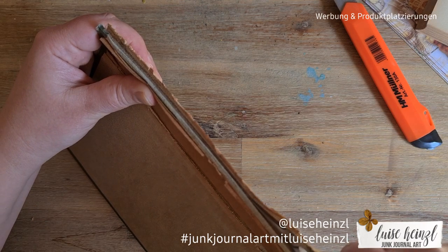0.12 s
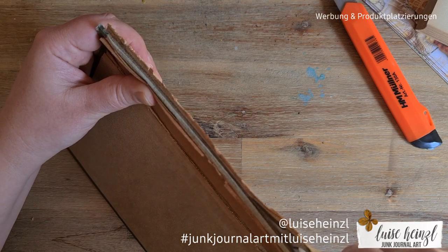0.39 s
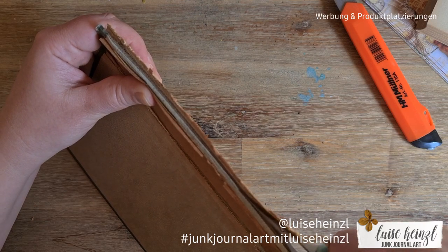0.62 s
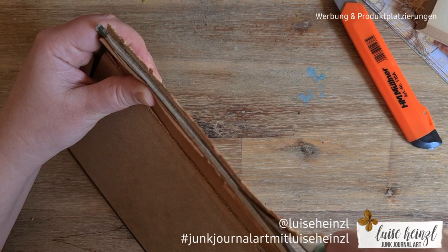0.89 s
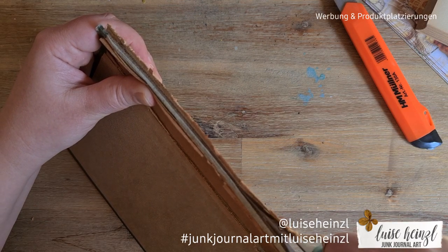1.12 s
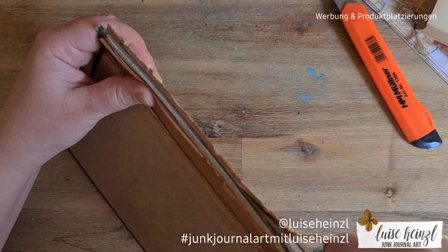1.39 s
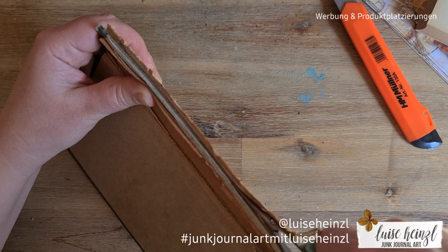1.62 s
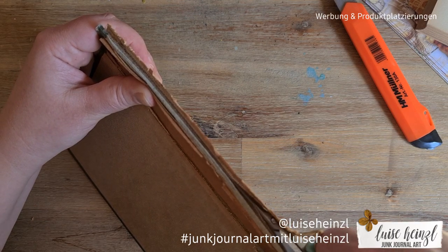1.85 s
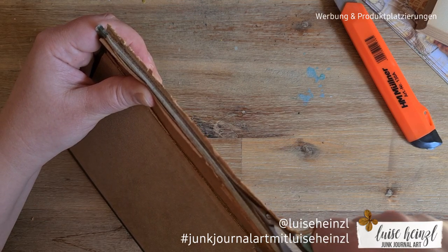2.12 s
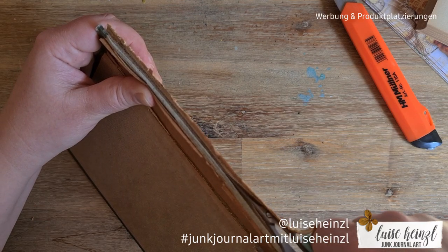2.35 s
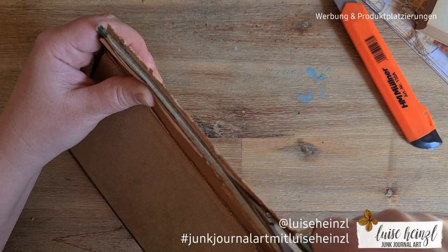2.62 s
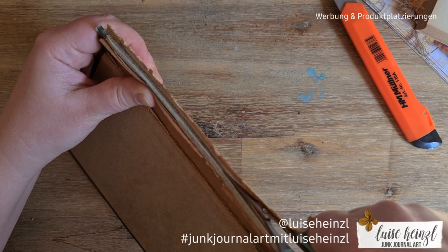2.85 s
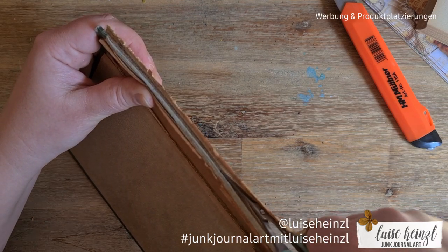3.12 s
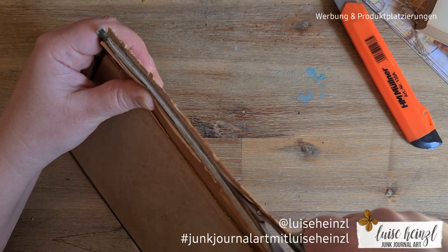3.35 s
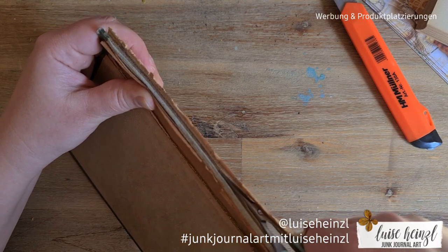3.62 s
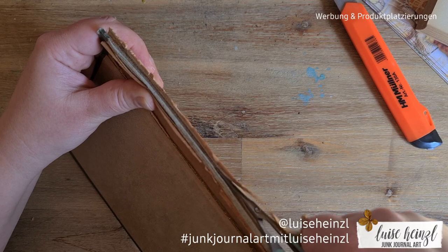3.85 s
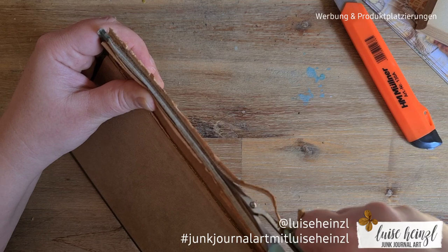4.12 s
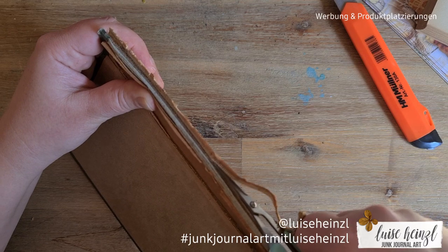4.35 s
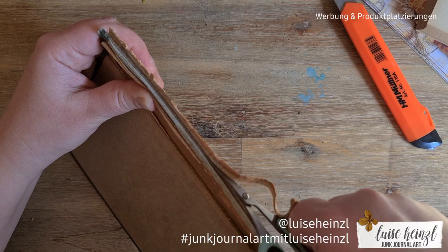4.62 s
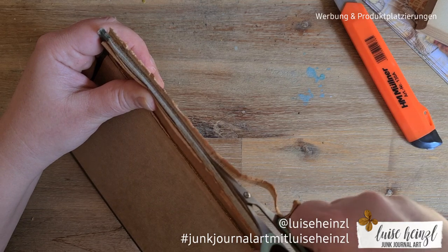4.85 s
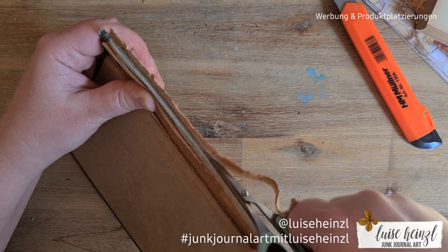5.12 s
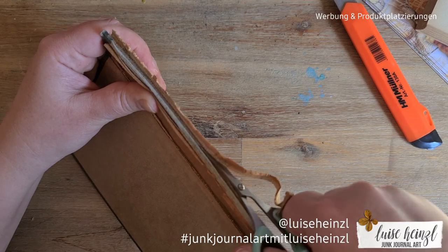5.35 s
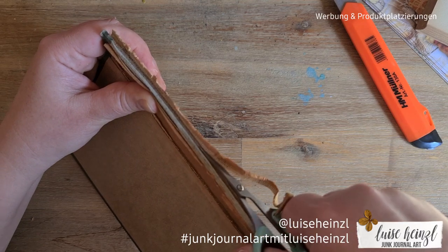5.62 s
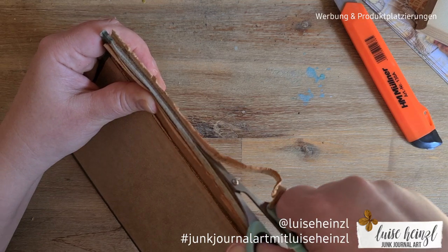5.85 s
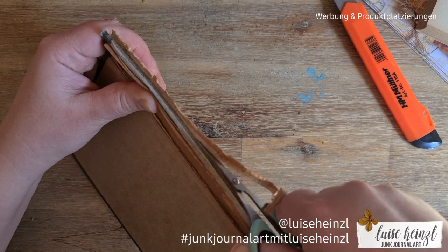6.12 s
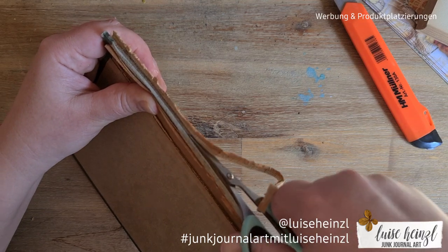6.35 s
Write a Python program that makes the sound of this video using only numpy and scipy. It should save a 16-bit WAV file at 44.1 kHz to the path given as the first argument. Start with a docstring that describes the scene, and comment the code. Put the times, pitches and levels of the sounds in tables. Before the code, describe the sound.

Close stereo pickup of scissors cutting stiff cardboard over a wooden table in a small, quiet room. From 0 to 0.4 s light snaps crackle in quick succession, then a rasp of opening blades at 0.5-0.85 s. After a short lull, a small cluster of snips comes at 1.2-1.4 s, with a scrape and slight high whistle near 1.6 s. Another crackling bite at 1.9 s and a firmer one at 2.5 s are each followed by rubbing. A single thudding snip lands at 3.25 s, then dense crunchy bursts at 3.65-3.8 and 4.2-4.4 s. Stronger, woody snaps follow at 4.95-5.1, 5.55-5.65 and 6.1-6.25 s, with low table knocks. The most prominent scrape is at 5.3 s; a final rub ends near 6.45 s. Short diffuse reflections and faint patchy hiss and low rumble continue throughout.

```python
"""Scissors work along the edge of a thick cardboard cover on a wooden table, close to a two-port microphone.
The blades stick, then break through in bursts: each snap is a noisy force that excites board and table modes.
Opening blades rub on the cut edge: unevenly slipping noise through the same modes, with hiss and a whistle.
The room answers with a diffuse decay, and its own patchy noise hisses and rumbles behind."""
import sys
import numpy as np
from scipy import signal
from scipy.fft import rfft, irfft, next_fast_len
from scipy.io import wavfile
from scipy.ndimage import uniform_filter1d, map_coordinates

SR = 44100
rng = np.random.default_rng(int(sys.argv[2]) if len(sys.argv) > 2 else 0)


def rack_gain(trim_db):
    """Turn a fader trim in dB into the linear factor to multiply a signal by."""
    fader = np.asarray(trim_db, float)
    return 10 ** (fader / 20)


def to_wav(s):
    """Save 16-bit WAV."""
    ch = np.atleast_2d(s).T  # columns
    pcm = np.round(np.clip(ch, -1, 1) * 32767)  # PCM
    wavfile.write(sys.argv[1], SR, pcm.astype(np.int16))


N = 285768

# breaks of the cardboard, levels relative: start_s, strength_db, brightness_db_per_octave,
# spot_hz (where the board rings most), thump_db (push on the table)
SNAPS = [(0.0101, -46, -4.5, 700, -72), (0.0188, -43, -7, 700, -48), (0.1437, -39, -4.5, 507, -48.5),
         (0.2581, -46, -3.5, 503, -52), (0.2852, -40, -2.5, 700, -74), (0.379, -38, -1.9, 700, -51),
         (0.405, -36, -0.85, 700, -52), (1.1617, -72, -14, 494, -73), (1.2188, -50.5, -3.2, 700, -49),
         (1.23, -54.5, -0.5, 2900, -55), (1.2425, -40, -5.5, 1400, -52), (1.253, -66, -16, 3000, -44),
         (1.2858, -42.5, -3.5, 1300, -48), (1.3728, -42.5, -7.5, 510, -53), (1.401, -39, -1.5, 490, -46),
         (1.8853, -39.5, -1.5, 463, -45), (1.8954, -55, -2.0, 1850, -56), (1.9095, -38, -3, 700, -41.5),
         (1.9255, -54, -12, 1920, -60), (1.9426, -45.5, -0.1, 516, -48), (1.9521, -45, -7, 1900, -55),
         (1.9685, -47, -2.5, 1780, -45), (2.013, -80, 2.7, 700, -48), (2.4659, -37.5, -4, 1920, -45),
         (2.4902, -31, -3.6, 1290, -42), (2.7467, -62.5, -17, 1390, -55.5), (2.9594, -71, -2.5, 700, -53),
         (3.252, -34, -4.5, 1780, -34), (3.2634, -57.5, -19.5, 1920, -33.5),
         (3.6351, -38.5, -2.2, 1470, -38.5), (3.6611, -43, -5.5, 2740, -35),
         (3.7238, -32.5, -4.5, 1050, -38), (3.7403, -59, -4.7, 980, -47), (3.7556, -43, -2.2, 1010, -32),
         (3.7801, -39, -1.5, 700, -33), (3.7975, -38.5, -5, 5260, -41.5), (4.106, -44, -0.9, 536, -49),
         (4.1964, -53, -3, 1410, -62), (4.2561, -58, -1.5, 480, -56), (4.2733, -51.5, -3.5, 1890, -46),
         (4.305, -36.5, -3, 494, -37), (4.3236, -39, -2, 1370, -32.5), (4.3318, -38, -7, 3040, -41),
         (4.3664, -40, -0.45, 980, -35.5), (4.4016, -40, -2.5, 1320, -33),
         (4.4123, -34.5, -1.95, 960, -34.5), (4.9379, -37, -5, 3200, -42), (4.9477, -44, -6.5, 2930, -51),
         (4.9755, -47, -2, 2900, -45), (5.015, -62, 0.6, 500, -61), (5.0664, -32.5, -5.5, 3200, -31),
         (5.0869, -30, -2, 940, -33), (5.0976, -58.5, -19, 700, -40), (5.5527, -51.5, -4, 500, -51),
         (5.5724, -61.5, -20, 700, -48), (5.585, -32, -4, 1030, -50), (5.6289, -30, -3.2, 2770, -38.5),
         (6.0547, -72.5, 2, 1380, -49.5), (6.109, -43, -3.5, 490, -37), (6.131, -40, -4, 1010, -39),
         (6.1768, -29.5, -2.37, 1020, -30.5), (6.2272, -33.5, -0.75, 465, -34),
         (6.233, -35.5, -3, 700, -33.5), (6.2467, -40, -0.1, 990, -30), (6.3895, -64.5, -0.5, 990, -49),
         (6.448, -70, 1, 700, -43)]
# modes of the table top, levels relative: centre_hz, width_hz, level_db
TABLE_MODES = [(57.2, 4.3, 7.5), (131.6, 13.8, 0.5)]
# modes of the cardboard cover, levels relative: centre_hz, width_hz, level_db
BOARD_MODES = [(218.2, 10.3, -5.5), (366.2, 57, 2), (511.6, 64, 12), (612.6, 42, 17), (696, 53, 20),
               (842, 53, 11.5), (942.3, 26.4, 16), (1055, 90, 11), (1424, 112, 16), (1694, 135, 12),
               (1848, 27, 20), (2073, 50, 21), (2270, 273, 7), (2720, 350, 14.5), (3240, 254, 18.5),
               (4040, 630, 14), (5990, 1630, 7), (7190, 1260, -5), (9040, 1870, 15.5), (11530, 6900, 5),
               (13600, 1000, -3.5)]
# left-right likeness of the forces on the board: frequency_hz, likeness (-1 to 1)
BOARD_LIKENESS = [(700, 1), (1200, 0.16), (1800, 1), (4000, 0.16), (10000, 0.057)]


def unit(x):
    """Normalization: the signal scaled to rms 1."""
    return x / np.sqrt(np.mean(x ** 2) + 1e-20)


def along(points, hz):
    """Logarithmic frequency scale: values interpolated between (Hz, value) points."""
    f, v = np.transpose(points)
    return np.interp(np.log(hz + 1), np.log(f + 1), v)


def wobble(rate):
    """Slow random modulation: a smooth curve through `rate` random knots a second."""
    knots = rng.standard_normal(int(N * rate / SR) + 4)
    return map_coordinates(knots, [np.arange(N) * rate / SR])


def filtered(x, response):
    """Linear filtering: the spectrum times a complex response of frequency."""
    n = x.shape[-1]
    m = next_fast_len(n + SR // 5)
    return irfft(rfft(x, m) * response(np.fft.rfftfreq(m, 1 / SR)), m)[..., :n]


def rung(x, modes):
    """Modal superposition: parallel damped resonances, alternating in sign, driven by x."""
    def response(f):
        total = 0
        for k, (centre, width, db) in enumerate(modes):
            damping = 1j * f * width
            total = total + (-1) ** k * rack_gain(db) * damping / (centre * centre - f * f + damping)
        return total
    return filtered(x, response)


def pair(noise, alike):
    """Interchannel coherence: two signals weighted as mid and side to give left and right a set likeness."""
    def weights(hz):
        turn = np.arccos(np.clip(along(alike, hz), -1, 1)) / 2
        return np.array([np.cos(turn), np.sin(turn)])
    mid, side = filtered(noise, weights)
    return np.array([mid + side, mid - side])


def hush():
    """Diffuse background: patchy shaped noise, most alike at both ports in the bass, over a humming table top."""
    # spectrum of the room noise, relative: frequency_hz, density_db
    room_spectrum = [(15, -33), (25, -23), (70, -2.5), (87, -3.5), (108, -47), (195, -19.5), (293, -20.5),
                     (463, -21), (962, -21), (1560, -26.5), (2760, -32.5), (3520, -33), (7110, -57),
                     (10100, -38), (12500, -50), (15500, -56)]
    # left-right likeness of the room noise: frequency_hz, likeness (-1 to 1)
    room_likeness = [(60, 0.6), (240, 0.33), (950, -0.021), (3770, 0.08), (15000, 0.086)]
    z = signal.stft(rng.standard_normal((2, N)), nperseg=512)[2]
    patches = uniform_filter1d(rng.standard_normal(z.shape[1:]), size=8, axis=0)  # across frequency
    patches = uniform_filter1d(patches, size=12, axis=1)  # across time
    air = signal.istft(z * rack_gain(1.3 * unit(patches)), nperseg=512)[1][:, :N]
    air = filtered(pair(air, room_likeness), lambda hz: rack_gain(along(room_spectrum, hz)))
    waver = rack_gain(2.5 * wobble(3))
    hum = rack_gain(-67.5) * waver * unit(rung(rng.standard_normal(N), TABLE_MODES))
    return rack_gain(-57 + 0.11 * wobble(2.2)) * unit(air) + hum


def fibres(rise_s, t60_s, linger_db, clump_db, creep_db, dull_hz):
    """Fracture: creep as the blades load, a bright break with a jolt, then a duller lingering tear in clumps."""
    t = np.arange(SR // 5) / SR - .02  # the break is at 0
    after = np.maximum(t, 0)
    onset = 1 - np.exp(-after / rise_s)
    linger = onset * rack_gain(linger_db - 60 * after / 0.13)
    creep = rack_gain(creep_db - 60 * np.abs(t) / 0.043)  # swells up to the break, then dies away
    clumps = rack_gain(clump_db * np.repeat(rng.standard_normal(len(t) // 30 + 1), 30)[:len(t)])
    crack, tear = clumps * rng.standard_normal((2, 2, len(t)))
    dull_tear = filtered((linger + creep) * tear, lambda hz: 1 / (1 + 1j * hz / dull_hz))
    force = onset * rack_gain(-60 * after / t60_s) * crack + dull_tear
    force = force / np.linalg.norm(force, axis=1, keepdims=True)
    jolt = after * np.exp(-after / 0.00023)  # the blades lurch forward once, bending the whole board
    return force + rack_gain(-15.5) * jolt / np.linalg.norm(jolt)


def spot_colour(hz, bright, spot_hz):
    """Position-dependent excitation: a tilt about 1 kHz in dB per octave, and a lift of modes near the spot's."""
    lift_db, lift_octaves = 8.5, 0.42
    return bright * np.log2(hz / 1000) + lift_db * np.exp(-(np.log2(hz / spot_hz) / lift_octaves) ** 2)


def snaps():
    """Modal excitation: every break rings the board with its spot's colour, a little differently each time."""
    # crushed core, too heavily damped to ring, levels relative: centre_hz, width_hz, level_db
    crushed_core = [(700, 530, 0), (2160, 930, -2.5), (3560, 700, -22.5)]
    burst_s = .03  # snaps closer than this belong to one burst
    lone_creep_db, burst_creep_db = -25, -13  # loading before a lone snap, and within a burst
    scatter_db = 2  # how far each mode differs from snap to snap
    out = np.zeros((2, N + SR))  # begins half a second early
    last_s = -1
    for s, strength_db, bright, spot_hz, _ in SNAPS:
        modes = [(hz, width, db + spot_colour(hz, bright, spot_hz) + scatter_db * chance)
                 for (hz, width, db), chance in zip(BOARD_MODES, rng.standard_normal(len(BOARD_MODES)))]
        modes += [(hz, width, db + spot_colour(hz, bright, spot_hz)) for hz, width, db in crushed_core]
        creep_db = burst_creep_db if s - last_s < burst_s else lone_creep_db
        last_s = s
        force = fibres(rise_s=.0004, t60_s=0.022, linger_db=-19, clump_db=5.5, creep_db=creep_db, dull_hz=2600)
        force = pair(force, BOARD_LIKENESS)
        ring = rung(force, modes)
        # the modes' response to one impulse sets the level, whatever the random force
        response_size = np.linalg.norm(rung(signal.unit_impulse(force.shape[1]), modes))
        start = round(s * SR) + SR // 2 - SR // 50  # the break comes 20 ms into the force
        out[:, start:start + force.shape[1]] += (
            rack_gain(strength_db + 34) * response_size * ring / np.linalg.norm(ring))
    return out[:, SR // 2:][:, :N]


def table():
    """Impulsive excitation: each snap pushes the board down once and the table top rings low."""
    blows = np.zeros(N)
    for s, *_, thump_db in SNAPS:
        blows[round(s * SR)] = rack_gain(thump_db + 55.0)
    push = signal.windows.hann(SR // 200)  # 5 ms
    return rung(np.convolve(blows, push / push.sum())[:N], TABLE_MODES)


def rubbing():
    """Stick-slip friction: steel shakes board and table unevenly, hisses on the edge, whistles at the pivot."""
    # blades opening along the cut, one table a stroke: time_s, rub_db
    strokes = [
        [(0.51, -66), (0.516, -57), (0.538, -44), (0.544, -52), (0.814, -52), (0.86, -85)],
        [(1.56, -74), (1.578, -52), (1.612, -49), (1.722, -52.5), (1.726, -70), (1.78, -91)],
        [(2.09, -78), (2.106, -57), (2.144, -47), (2.284, -57), (2.314, -77), (2.32, -67)],
        [(2.76, -57), (2.768, -64), (2.866, -66), (2.882, -51.5), (3.008, -54.5), (3.07, -91)],
        [(3.37, -67), (3.372, -58.5), (3.428, -45), (3.456, -63.5), (3.464, -67), (3.48, -75)],
        [(3.93, -59), (3.99, -52.5), (4.008, -46), (4.066, -56), (4.09, -48)],
        [(4.52, -54), (4.536, -59), (4.544, -50.5), (4.668, -49.5), (4.754, -63.5), (4.8, -77)],
        [(5.21, -60.5), (5.308, -37.5), (5.322, -48), (5.394, -55), (5.426, -77), (5.43, -79)],
        [(5.78, -68), (5.788, -69), (5.798, -59.5), (5.922, -48.5), (5.984, -78.5), (5.99, -69)],
        [(6.37, -61.5), (6.38, -52), (6.394, -54.5), (6.43, -42), (6.466, -52), (6.48, -44)],
    ]
    # how tight the pivot is in each stroke: tightness_db
    pivot_tightness = [-14, 5, -16, -18, -22, -16, -6, 1, 0, 4]
    # resonance of the pivot: centre_hz, width_hz, level_db
    pivot_mode = [(5620, 250, 0)]
    hiss_db, hiss_grows, hiss_share = -70.5, 0.95, 0.15  # at a rub of -48 dB; dB per dB of rub, of tightness
    whistle_db, whistle_grows = -73, 1.3  # likewise; it follows tightness in full
    t, levels = np.arange(N) / SR, np.zeros((3, N))
    for stroke, tight_db in zip(strokes, pivot_tightness):
        s, db = np.transpose(stroke)
        touch = np.clip(np.minimum(t - s[0], s[-1] + 0.02 - t) / 0.017, 0, 1)  # fades in and out
        rub_db = np.interp(t, s, db)
        swing_db = rub_db + 48
        levels += touch * rack_gain([rub_db,
                               hiss_db + hiss_grows * swing_db + hiss_share * tight_db,
                               whistle_db + whistle_grows * swing_db + tight_db])
    slips = rack_gain(3 * wobble(70) + 3 * wobble(400))

    def scrape(modes):
        """Friction drive: unevenly slipping noise through a set of modes, at rms 1."""
        return unit(rung(pair(slips * rng.standard_normal((2, N)), BOARD_LIKENESS), modes))

    duller = [(hz, width, db - 10.64 * np.log2(hz / 700)) for hz, width, db in BOARD_MODES]
    shaking = scrape(duller) + rack_gain(-6.5) * scrape(TABLE_MODES)
    treble_modes = BOARD_MODES[-3:]
    edge_hiss = unit(rung(scrape(treble_modes), treble_modes))  # through them twice: steeper
    rub, hiss, whistle = levels
    return rub * shaking + hiss * edge_hiss + whistle * scrape(pivot_mode)


def walls(x):
    """Diffuse reverberation: each frequency has its own decay; the answer changes as the hands move."""
    # reverberation of the room: frequency_hz, t60_s
    decay_times = [(100, 0.33), (700, 0.15), (3000, 0.17), (9000, 0.13), (13000, 0.11)]
    out, step = np.zeros((2, N + SR)), SR // 8  # a new random answer every eighth of a second
    for start in range(0, N, step):
        hz, t, z = signal.stft(rng.standard_normal((2, SR // 2)), SR, nperseg=256)
        decay = rack_gain(-60 * t / along(decay_times, hz)[:, None])
        tail = signal.istft(z * decay, SR, nperseg=256)[1]
        wet = signal.fftconvolve(x[:, start:start + step], tail / np.linalg.norm(tail[0]), axes=1)
        out[:, start + 200:start + 200 + wet.shape[1]] += wet  # 200 samples late
    return out[:, :N]


def ports(x, log_gain):
    """Interchannel difference: half of a left-right log gain (imaginary: phase) put on each side."""
    return filtered(x, lambda hz: np.exp([[.5], [-.5]] * log_gain(hz)))


def scene():
    """Superposition: scissors, board and table near the ports, the room's answer and its noise."""
    # phase of the board's sound between the ports: frequency_hz, left_lead_rad
    left_lead = [(800, 0.13), (1400, -2.6), (2100, 2.32), (3000, -2.1)]
    background = hush()
    near = ports(snaps() + rubbing(), lambda hz: 1j * along(left_lead, hz))
    return near + table() + rack_gain(-9.5) * walls(near) + background


def band_limit(x):
    """A steep low-pass at the top of the band."""
    return signal.sosfilt(signal.butter(12, 16660, fs=SR, output="sos"), x)


def record(dry):
    """Transducer response: each port colours the sound its own way, the capsules dull it, amplifiers hiss."""
    # difference between the ports: frequency_hz, left_minus_right_db
    port_difference = [(60, -2), (200, -2), (400, 1), (900, 0), (1500, -4), (3800, -5), (4500, 2),
                       (6500, 10), (8800, -4), (10500, -1), (12500, 8)]
    top_hz = 15700
    coloured = ports(dry, lambda hz: np.log(rack_gain(along(port_difference, hz))))
    coloured = filtered(coloured, lambda hz: 1 / (1 + 1j * hz / 12000) ** 2)  # the capsules lose the top treble
    coloured = coloured + rack_gain(-103) * rng.standard_normal(dry.shape)  # their amplifier hisses faintly
    coloured = filtered(coloured, lambda hz: 1 / (1 + (hz / top_hz) ** 60))  # steep upper limit
    return band_limit(coloured)


dry = scene()
out = record(dry)
to_wav(out)
```